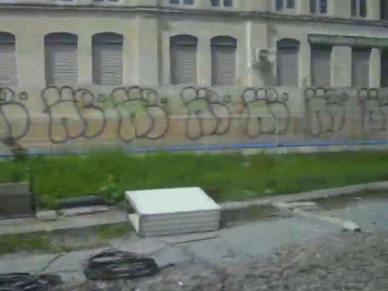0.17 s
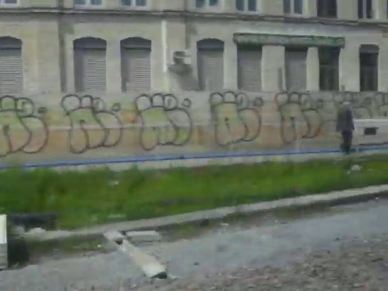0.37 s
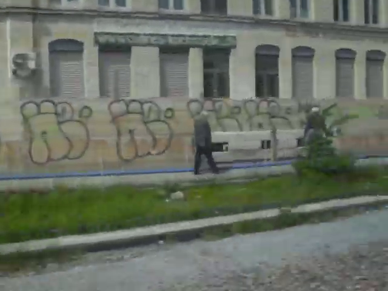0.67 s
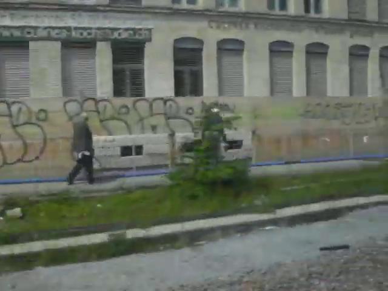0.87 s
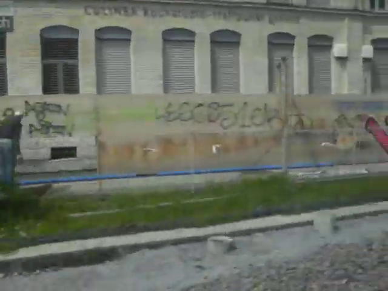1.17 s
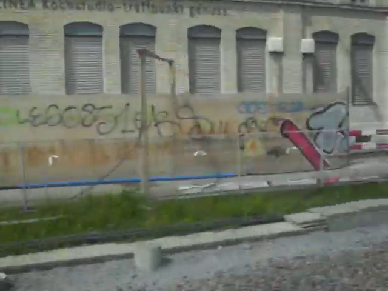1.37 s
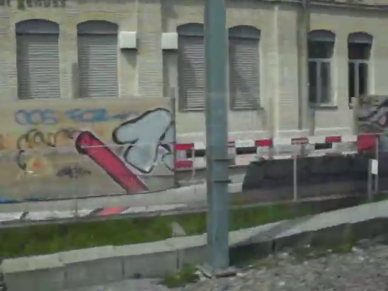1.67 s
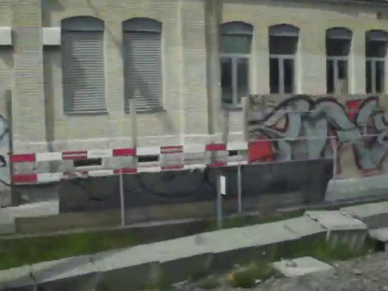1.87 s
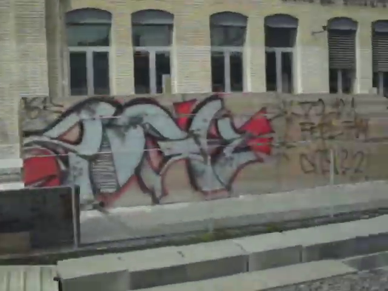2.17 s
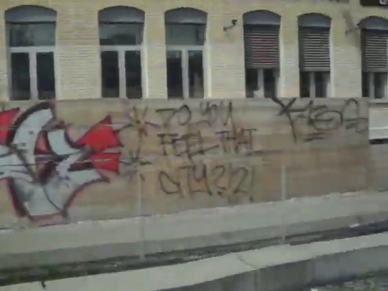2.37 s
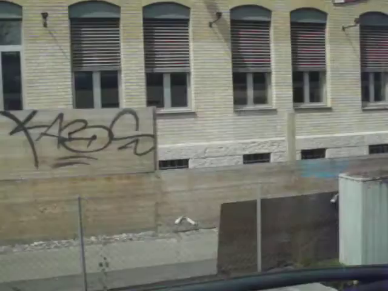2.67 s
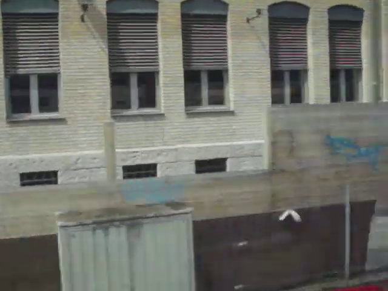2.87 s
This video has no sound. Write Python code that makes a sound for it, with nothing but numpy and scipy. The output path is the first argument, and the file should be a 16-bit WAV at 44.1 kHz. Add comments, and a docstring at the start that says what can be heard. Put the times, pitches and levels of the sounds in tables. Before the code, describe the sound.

A train rumbles throughout, heard from inside the carriage, slightly muffled, with a faint rush of air. The rumble swells as wheels thump over rail joints around 0.3 seconds, with another thump at 1.4. A faint, brief wheel squeal comes near 2.1. From 2.2 seconds thumps and knocks gather; a loose fitting clacks sharply at 2.4, then clatters more softly around 2.8.

```python
"""A low, swelling rumble fills a moving train as its wheels roll on rough rail and the carriage booms.
The wheels thump over rail joints, the running gear knocks, and the hardest jolts make a loose
fitting clack and clatter. Behind this are the deep sway of the carriage, a rush of air, a faint
wheel squeal and a few ticks from the trim. The whole sound has lost its high treble."""
import sys
import numpy as np
from scipy.fft import rfft, irfft, next_fast_len
from scipy.io import wavfile
from scipy.ndimage import map_coordinates

SR = 44100
rng = np.random.default_rng(int(sys.argv[2]) if len(sys.argv) > 2 else 0)


def pcm_store(signal):
    """Save signal as 16-bit PCM."""
    levels = np.round(np.clip(np.atleast_2d(signal), -1, 1) * 32767)
    wavfile.write(sys.argv[1], SR, levels.astype(np.int16).T)


N = 133182


def amp(db):
    """Turn decibels into a number to multiply a sound by."""
    return 10 ** (np.asarray(db) / 20)


def unit(x):
    """Scale a sound so that its average strength (rms) is 1."""
    return x / np.sqrt(np.mean(x ** 2) + 1e-20)


def curve(rows):
    """Join (time, value) points with straight lines, one value per sample."""
    return np.interp(np.arange(N) / SR, *np.transpose(rows))


def wobble(rate):
    """A smooth curve through `rate` random values a second."""
    points = rng.standard_normal(int(N * rate / SR) + 4)
    return map_coordinates(points, [np.arange(N) * rate / SR])


def filtered(x, response):
    """Turn each frequency of a sound up or down by response(frequency)."""
    size = next_fast_len(len(x) + 8192)
    return irfft(rfft(x, size) * response(np.fft.rfftfreq(size, 1 / SR)), size)[:len(x)]


def noise(colour, size):
    """Noise of strength 1 whose colour says how strong its low and high frequencies are."""
    freqs, db = np.transpose(colour)
    white = rng.standard_normal(size)
    return unit(filtered(white, lambda hz: amp(np.interp(np.log(hz + 1), np.log(freqs + 1), db))))


def blow_shape(t, fade_s, rise_s):
    """A blow rises fast and dies away; its fade time is how long it takes to drop 60 dB."""
    return (1 - np.exp(-t / rise_s)) * amp(-60 * t / fade_s)


def burst(colour, shape, pitch=1):
    """A blow rings many tones at once, which sounds like a short puff of noise."""
    shifted_colour = np.array(colour) * [pitch, 1]
    puff = noise(shifted_colour, len(shape)) * shape
    return unit(puff) * np.sqrt(np.mean(shape ** 2))


# how loud the air is (time [s], level [dB])
AIR_LEVELS = [(.2, -48), (.6, -48), (1.1, -49), (1.74, -46.5), (1.83, -44), (2.03, -49), (2.56, -48),
              (2.7, -44), (3.0, -45.5)]
# the tone of the air (frequency [Hz], relative level [dB])
AIR_COLOUR = [(300, -27), (1200, 2), (2000, -0.5), (2400, -3.5), (2900, -2.5), (3300, -6.5), (3800, -12),
              (4300, -29)]

def air():
    """Air rushes faintly along the carriage."""
    return amp(curve(AIR_LEVELS)) * noise(AIR_COLOUR, N)


# the squeal's tone (pitch [Hz], width [Hz], level [dB])
SQUEAL_TONE = (1213, 91, -36.5)

def squeal(peak_s=2.075, width_s=.045):
    """The lip of a wheel brushes the rail: a rough tone that comes and goes."""
    pitch, width_hz, db = SQUEAL_TONE
    tone = unit(filtered(rng.standard_normal(N), lambda hz: np.exp(-((hz - pitch) / width_hz) ** 2)))
    swell = np.exp(-((np.arange(N) / SR - peak_s) / width_s) ** 2)
    return amp(db) * swell * tone


# small, dry ticks of the trim (time [s], level [dB])
TRIM_TICKS = [(0.9046, -30.5), (0.9126, -27), (0.929, -25)]

def ticks(pitch_hz=3130, fade_s=0.0032):
    """The trim snaps, making tiny clicks that die almost at once."""
    track, t = np.zeros(N), np.arange(SR // 8) / SR
    for start, db in TRIM_TICKS:
        add(track, start, amp(db - 60 * t / fade_s) * np.sin(2 * np.pi * pitch_hz * t))
    return track


def add(track, start, sound):
    """Mix a sound into the track, `start` seconds in."""
    part = track[round(start * SR):][:len(sound)]
    part += sound[:len(part)]


# how loud the sway is (time [s], level [dB])
SWAY_LEVELS = [(0, -38), (.07, -25), (.15, -26.5), (.48, -27), (.58, -30), (1.32, -32.5), (1.4, -26),
               (1.72, -33), (1.82, -26.5), (2.08, -36), (2.35, -27), (2.55, -33.5), (2.9, -23.5)]
# the tone of the sway (frequency [Hz], relative level [dB])
SWAY_COLOUR = [(10, -8), (33, -5.5), (44, -5), (56, 0.5), (75, -9.5), (120, -24), (300, -66)]

def sway():
    """The carriage rocks on its springs with a very deep rumble."""
    return amp(curve(SWAY_LEVELS)) * noise(SWAY_COLOUR, N)


# the carriage's own notes (pitch [Hz], width [Hz], relative level [dB])
CARRIAGE_NOTES = [(242, 21, 2.5), (425.5, 23, -3.5), (481, 8.3, -7.5), (730, 16, -16.5)]

def carriage_boom(shaking):
    """The carriage booms where the shaking matches one of its own notes."""
    def response(hz):
        return sum(amp(db) * 1j * hz * width / (pitch ** 2 - hz ** 2 + 1j * hz * width)
                   for pitch, width, db in CARRIAGE_NOTES)
    return filtered(shaking, response)


# how loud the wheels' low rumble and brighter roar are (time [s], level [dB])
RUMBLE_LEVELS = [(0, -28.5), (.06, -30), (.15, -37.5), (.26, -24), (.35, -22), (.43, -22), (.5, -26),
                 (.57, -25.5), (.7, -29), (1.15, -30), (1.22, -28), (1.45, -28.5), (1.56, -30.5),
                 (2.05, -31), (2.45, -28), (2.68, -31.5), (2.98, -25)]
ROAR_LEVELS = [(0, -29), (.06, -32), (.14, -35), (.32, -26.5), (.47, -25), (.51, -34.5), (.6, -31.5),
               (.68, -35), (1.77, -36), (2.17, -37.5), (2.34, -34.5), (2.62, -36.5), (3.0, -30.5)]
# the tone of each (frequency [Hz], relative level [dB])
RUMBLE_COLOUR = [(50, -31), (85, -1.5), (135, 2.5), (190, -4), (300, -4), (400, -2.5), (580, -17),
                 (800, -32.5), (1300, -26.5), (3000, -48)]
ROAR_COLOUR = [(200, -24.5), (450, 5), (750, 3.5), (1000, 1), (1280, -3), (1550, -16.5), (2100, -21),
               (3000, -26), (4000, -52.5)]

def rolling(boom_db=-0.5, rumble_rough_db=0.23, roar_rough_db=1.2, flutter_db=1.68):
    """Rough rail shakes the wheels, so they rumble and roar and the carriage booms."""
    boom = amp(boom_db) * unit(carriage_boom(noise(RUMBLE_COLOUR, N)))
    rumble = noise(RUMBLE_COLOUR, N) * amp(rumble_rough_db * wobble(70))
    roar = noise(ROAR_COLOUR, N) * amp(roar_rough_db * wobble(90))
    flutter = amp(flutter_db * wobble(16))
    return flutter * (amp(curve(RUMBLE_LEVELS)) * unit(rumble + boom) + amp(curve(ROAR_LEVELS)) * roar)


# knocks under the floor (time [s], level [dB], fade time [s], pitch [ratio])
GEAR_KNOCKS = [(.046, -22.5, 0.033, 0.82), (1.178, -20, 0.15, 0.96), (2.2225, -15, 0.056, 0.81),
               (2.316, -24, 0.053, 1.7), (2.386, -18.5, 0.078, 0.94), (2.415, -13.5, .12, 1.006),
               (2.4645, -13, 0.039, 1.024), (2.7375, -23.5, .08, 1.15), (2.771, -17.5, 0.055, 0.91),
               (2.779, -18, 0.062, 1.23), (2.82, -16, 0.13, 0.85), (2.849, -15, 0.077, .97)]
# the tone of a knock (frequency [Hz], relative level [dB])
KNOCK_COLOUR = [(80, -27), (250, -5), (430, 9), (620, -1.5), (800, 3.5), (1000, -9), (1300, 2),
                (1650, -13.5), (2500, -35), (4400, -44.5)]

def knocks(rise_share=0.035):
    """The running gear under the floor knocks lightly; longer knocks start more softly."""
    track, t = np.zeros(N), np.arange(SR // 4) / SR
    for start, db, fade_s, pitch in GEAR_KNOCKS:
        shape = blow_shape(t, fade_s, rise_share * fade_s)
        add(track, start, amp(db) * burst(KNOCK_COLOUR, shape, pitch))
    return track


# when the fitting chatters (time [s], length [s], level [dB])
CHATTER_SPELLS = [(2.758, .075, -32)]

def chatter_hits(hits_per_s=290, scatter_db=4.5, fade_s=0.019):
    """List the tiny, uneven hits of the loose fitting as it chatters on after a jolt."""
    hits = []
    for start, length, db in CHATTER_SPELLS:
        delays = (np.arange(40) + rng.random(40)) / hits_per_s
        levels = db + scatter_db * rng.standard_normal(40)
        hits += [(start + delay, level, fade_s) for delay, level in zip(delays, levels) if delay < length]
    return hits


# hits of the loose fitting (time [s], level [dB], fade time of the crack [s])
FITTING_CLACKS = [(2.317, -33.5, 0.18), (2.405, -19, 0.032), (2.4092, -6, .022), (2.4115, -7.5, 0.03),
                  (2.417, -23, 0.11), (2.466, -38.5, 0.16), (2.7368, -17, 0.028), (2.746, -16.5, 0.044),
                  (2.78, -27, 0.052), (2.838, -22, 0.052), (2.8482, -15, 0.04)]
# the notes it rings with (pitch [Hz], relative level [dB])
FITTING_NOTES = [(760, 1.5), (1200, -9), (1460, -9.5), (1812, -3), (2160, -8.5), (2447, 1.5), (2965, -3)]
# the tone of a crack, before a slight drop in pitch (frequency [Hz], relative level [dB])
CRACK_COLOUR = [(200, -24), (750, -4), (1450, -4.5), (2100, -7.5), (2450, -5), (2950, 1), (3330, -8),
                (3650, -21.5), (4300, -33)]

def clatter(ring_db=-13.5, ring_fade_s=.06, rise_s=.0005):
    """Each hit of the loose fitting makes a sharp crack and a short ring."""
    track, t = np.zeros(N), np.arange(SR // 8) / SR
    notes = np.array([amp(db) * np.exp(2j * np.pi * hz * t) for hz, db in FITTING_NOTES])
    for start, db, fade_s in list(FITTING_CLACKS) + chatter_hits():
        phases = np.exp(2j * np.pi * rng.random(len(notes)))  # each note starts anywhere in its wave
        ring = (phases @ notes).real * blow_shape(t, ring_fade_s, rise_s)
        crack = burst(CRACK_COLOUR, blow_shape(t, fade_s, rise_s), pitch=0.98)
        add(track, start, amp(db) * (amp(ring_db) * ring + crack))
    return track


# wheels hitting rail joints (time [s], level [dB], fade time [s], pitch of the shudder [Hz])
JOINT_THUMPS = [(0.051, -15.5, 0.092, 71), (.259, -8, 0.12, 255.5), (.334, -10, 0.11, 245.5),
                (.409, -6, 0.041, 458), (1.371, -9.5, 0.07, 213.5), (2.218, -3.5, 0.059, 192),
                (2.316, -14.5, 0.2, 119), (2.389, -6, 0.061, 340), (2.817, -5, 0.099, 231.3),
                (2.938, -18.5, 0.088, 378)]
# the tone of the thud (frequency [Hz], relative level [dB])
THUD_COLOUR = [(30, -11), (125, -4.5), (250, -2), (420, -5), (600, -20), (1250, -24), (1600, -38),
               (4400, -68)]

def thumps(shudder_db=-1, thud_db=-4, rise_share=0.047):
    """Each rail joint gives a dull thud and makes the floor shudder briefly."""
    track, t = np.zeros(N), np.arange(SR // 4) / SR
    for start, db, fade_s, hz in JOINT_THUMPS:
        shape = blow_shape(t, fade_s, rise_share * fade_s)
        shudder = amp(shudder_db) * shape * np.sin(2 * np.pi * hz * t)
        thud = amp(thud_db) * burst(THUD_COLOUR, shape)
        add(track, start, amp(db) * (shudder + thud))
    return track


def scene():
    """Everything together, as heard from a window seat."""
    return (thumps() + knocks() + sway() + air() + rolling() + squeal() + clatter() + ticks())[None]


def record(dry):
    """The sound loses its high treble, and the hardest clack clips with a faint click."""
    treble_limit_hz, clip_level, top_hz = 4400, .72, 16000
    dull = filtered(dry[0], lambda hz: np.clip((treble_limit_hz - hz) / 300, 0, 1))
    clipped = np.clip(dull, -clip_level, clip_level)
    return filtered(clipped, lambda hz: hz < top_hz)[None]


dry = scene()
out = record(dry)
pcm_store(out)
```